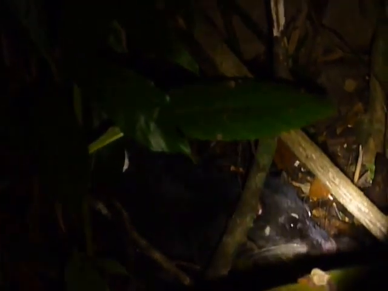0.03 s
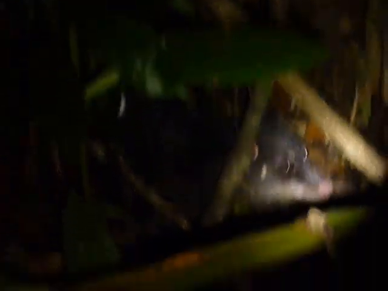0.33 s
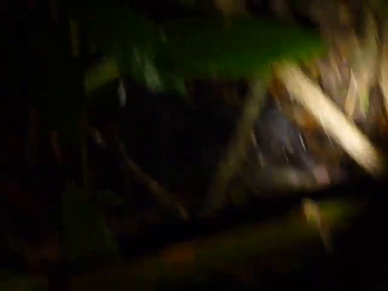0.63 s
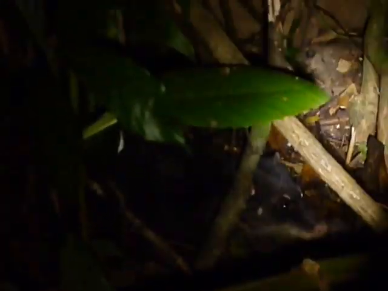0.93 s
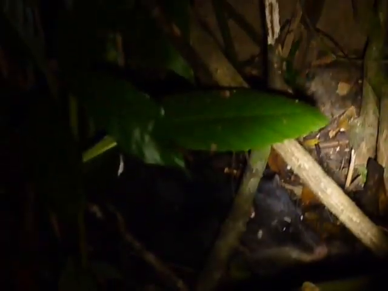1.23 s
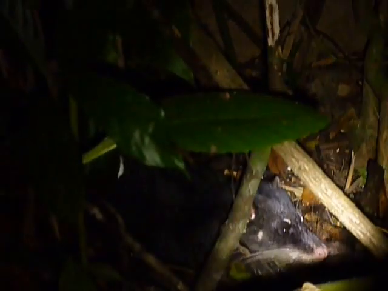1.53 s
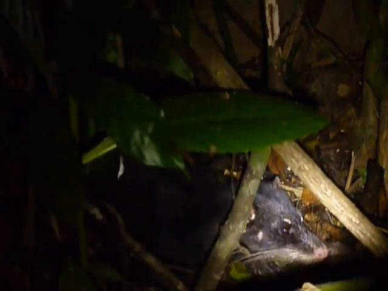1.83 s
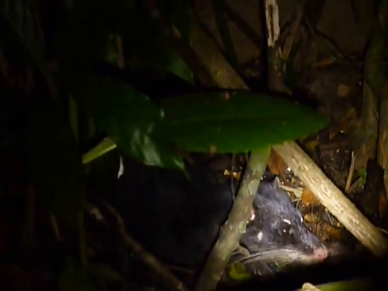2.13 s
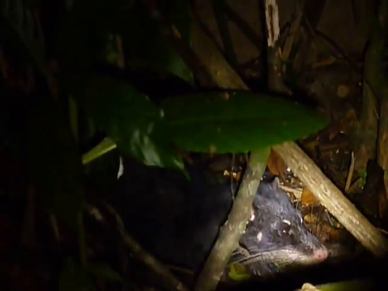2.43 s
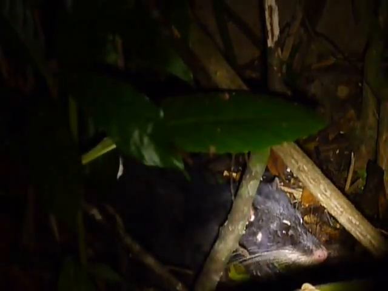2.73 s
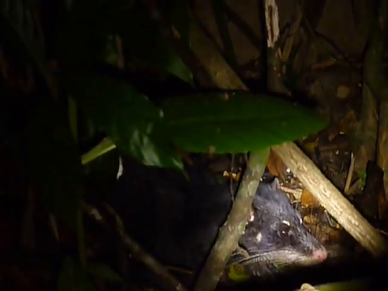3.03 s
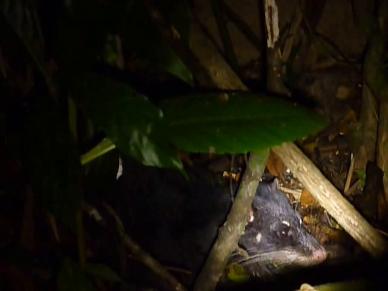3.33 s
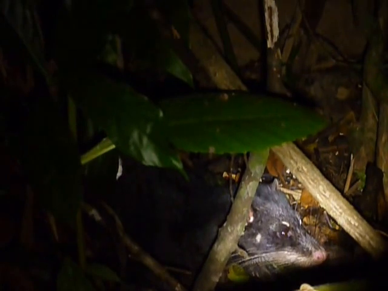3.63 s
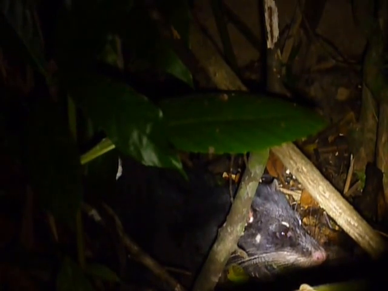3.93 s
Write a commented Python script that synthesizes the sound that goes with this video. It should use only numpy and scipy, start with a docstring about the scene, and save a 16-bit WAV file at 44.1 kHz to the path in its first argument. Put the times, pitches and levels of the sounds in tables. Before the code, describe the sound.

Crickets trill and chirp in a night forest, with one brief woody knock close by.

```python
"""Crickets trill and chirp at several pitches in a forest at night, over a soft low rush.
Each closing of a cricket's wings makes one pulse of tone, and the trees scatter the pulses.
Far insects rasp and sizzle. Near three seconds something close by ticks, knocks once and
gives a short woody scrape. A small camera picks it all up, with no top treble."""
import sys
import numpy as np
from scipy import signal
from scipy.fft import rfft, irfft
from scipy.io import wavfile
from scipy.ndimage import uniform_filter1d

SR = 44100
rng = np.random.default_rng(int(sys.argv[2]) if len(sys.argv) > 2 else 0)


def master(y):
    """Save y as 16-bit WAV."""
    cut = np.clip(np.atleast_2d(y).T, -1, 1)
    pcm = np.round(cut * 32767)  # scale
    wavfile.write(sys.argv[1], SR, pcm.astype(np.int16))


N = 176400
FOREST_T60_S = 0.49  # time for the forest's echo to fade by 60 dB


def undb(db):
    """Turn decibels into a gain."""
    return 10 ** (np.asarray(db) / 20)


def unit(x):
    """Scale a signal to an average (rms) size of 1."""
    return x / np.sqrt(np.mean(x ** 2) + 1e-20)


def clock():
    """The time of each sample, in seconds."""
    return np.arange(N) / SR


def walk(rate):
    """A smooth random wobble of size 1, with about `rate` turns a second."""
    hold = max(int(SR / rate), 1)
    steps = np.repeat(rng.standard_normal(N // hold + 1), hold)
    return unit(uniform_filter1d(uniform_filter1d(steps, hold), hold)[:N])


def band(x, hz, width_hz):
    """Keep the sound near one pitch by passing it through a resonance twice."""
    b, a = signal.iirpeak(hz, hz / width_hz / np.sqrt(np.sqrt(2) - 1) / 2, fs=SR)
    return signal.lfilter(b, a, signal.lfilter(b, a, x))


def hiss(hz, width_hz):
    """Noise around one pitch."""
    return unit(band(rng.standard_normal(N), hz, width_hz))


def gate(start, length, edge_s):
    """Fade in, hold and fade out."""
    t = clock() - start
    return np.sin(np.pi / 2 * np.clip(np.minimum(t, length - t) / edge_s + .5, 0, 1)) ** 2


def bursts(rows, edge_s):
    """A loudness curve that opens once for each row of start, length and dB."""
    return sum(undb(db) * gate(start, length, edge_s) for start, length, db in rows)


def trees(x, wet, t60=FOREST_T60_S):
    """Trunks and leaves scatter a share of the sound (wet, 0 to 1) into a soft echo."""
    tail = rng.standard_normal(SR) * np.exp(-np.log(1000) * clock()[:SR] / t60)
    echo = unit(signal.fftconvolve(x, tail)[:N]) * np.std(x)
    return np.sqrt(1 - wet) * x + np.sqrt(wet) * echo


def beat(per_s):
    """A running count of wing strokes at a slightly unsteady rate."""
    return rng.random() + np.cumsum(per_s * (1 + .02 * walk(2))) / SR


def wings(hz, strokes, fall_hz, duty=.8, drift_hz=14):
    """Each closing of the wings makes a falling pulse of tone; duty is its share of the stroke."""
    progress = np.clip(strokes % 1 / duty, 0, 1)
    pitch = hz + fall_hz * (.5 - progress) + drift_hz * walk(20)
    pulse_phase = rng.random(1024)[np.floor(strokes).astype(int) % 1024]
    tone = np.sin(2 * np.pi * (np.cumsum(pitch) / SR + pulse_phase))
    return unit(np.sin(np.pi * progress) * tone)


def cricket_chorus():
    """Distant crickets beat their wings without a pause."""
    # Each row: pitch in Hz, pulses a second, fall within a pulse in Hz, level in dB, scattered share.
    singers = [(4860, 63, 190, -64, 0.5), (4780, 53, 160, -66, 0.6), (4618, 65, 300, -70, 0.8),
               (5407, 76, 170, -63, 0.9), (5667, 33, 190, -68, 0.6), (5794, 39, 160, -74.5, 1)]
    return sum(undb(db + .8 * walk(7.4)) * trees(wings(hz, beat(rate), fall_hz), wet)
               for hz, rate, fall_hz, db, wet in singers)


def forest_air():
    """A soft rush whose octaves swell together and flicker alone, with faint whines in it."""
    # The tone of the rush. Each row: frequency in Hz, relative level in dB.
    rush_shape = [(25, -14), (60, -12.5), (130, -0.5), (230, 0), (330, -3.5), (700, -7.5), (1200, -12.5),
                  (2500, -18.5), (4200, -22), (7800, -22)]
    # Steady whines. Each row: pitch in Hz, width in Hz, level in dB.
    whines = [(1500, 79, -77), (2440, 42, -77), (3127, 59, -77)]
    octave = np.log2(np.maximum(np.arange(N // 2 + 1) * SR / N, 1))
    shape_hz, shape_db = np.array(rush_shape).T
    spectrum = rfft(rng.standard_normal(N)) * undb(np.interp(octave, np.log2(shape_hz), shape_db))
    swell_db = .5 * walk(.64)
    rush = 0
    for centre in range(5, 14):  # octaves from 32 to 8192 Hz
        layer = irfft(spectrum * np.maximum(1 - abs(octave - centre), 0), N)
        rush += layer * undb(swell_db + .63 * walk(10))
    return undb(-52) * unit(rush) + sum(undb(db) * hiss(hz, width) for hz, width, db in whines)


def nearest_cricket():
    """The nearest cricket closes its wings evenly, in slow, distinct pulses."""
    # Its loudness over time. Each row: time in seconds, level in dB.
    levels = [(0, -66.5), (.08, -61), (.12, -59.5), (1.101, -60), (2, -62), (4, -63)]
    first_stroke_s, pulses_per_s = .031, 25.4
    strokes = (clock() - first_stroke_s) * pulses_per_s
    song = wings(5479, strokes, fall_hz=74.8, duty=.65, drift_hz=10)
    level_db = np.interp(clock(), *np.array(levels).T) + 1.6 * walk(15)
    return trees(song * undb(level_db), wet=.47)


def far_insects():
    """Far insects sing toneless songs: spaced rasps and a high, unbroken sizzle."""
    # Each row is one rasp: start in seconds, level in dB.
    rasps = [(.15, -70), (.46, -70), (.80, -73), (1.15, -70.5), (1.50, -69), (1.87, -71), (2.21, -72),
             (2.52, -71), (2.819, -74), (3.14, -74), (3.40, -74), (3.59, -74), (3.80, -76)]
    loudness = sum(undb(db) * gate(start, length=.11, edge_s=.059) for start, db in rasps)
    rasping = loudness * hiss(6570, width_hz=310)
    sizzle = undb(-77.5 + 2.1 * walk(110)) * hiss(7480, width_hz=350)
    return rasping + sizzle


def chirping_cricket():
    """A higher cricket makes about eight short falling chirps a second, and stops within a second."""
    # Each row is one chirp: start in seconds, level in dB.
    chirps = [(0.077, -56), (.208, -57), (.335, -56.5), (.478, -59.5), (.597, -61.5), (0.721, -56),
              (.848, -56)]
    hz, fall_hz, length_s = 5850, 70.8, .041
    song = 0
    for start, db in chirps:
        progress = np.clip((clock() - start) / length_s, 0, 1)
        pitch = hz + fall_hz * (.5 - progress) + 30 * walk(200)
        tone = unit(np.sin(2 * np.pi * np.cumsum(pitch) / SR))
        song += undb(db) * gate(start, length_s, edge_s=.028) * tone
    return trees(song, wet=.3, t60=.3)


def trilling_crickets():
    """Crickets take turns with short, fast trills that swell out of the chorus."""
    # Each row is one trill: start in seconds, length in seconds, pitch in Hz, level in dB.
    trills = [(0.087, 0.27, 4782, -54.5), (.48, 0.18, 4810, -61), (0.892, 0.25, 4760, -59),
              (1.348, 0.17, 4890, -57), (1.714, .30, 4782, -56), (2.12, .29, 4810, -60.5),
              (2.542, .35, 4778, -57), (3.13, .28, 4824, -59.5), (3.52, .26, 4767, -57.5)]
    song = 0
    for start, length, hz, db in trills:
        pulses = wings(hz, beat(per_s=66), fall_hz=155.05, duty=.9, drift_hz=11.97)
        song += undb(db) * gate(start, length, edge_s=.07) * pulses
    return trees(song, wet=.49, t60=.29)


def thin_ticks():
    """Tiny bursts of bright noise: one alone, then a few around the knock."""
    # Each row is one tick: start in seconds, length in seconds, level in dB.
    ticks = [(2.234, .004, -64), (2.982, .012, -60), (2.998, 0.0055, -52), (3.004, 0.0063, -56),
             (3.017, 0.01, -57)]
    return hiss(7400, width_hz=1000) * bursts(ticks, edge_s=.0018)


def knock():
    """One dull knock rings with a few tones that die away quickly."""
    # Each row is one tone: pitch in Hz, seconds to fade by 60 dB, relative level in dB.
    tones = [(765, 0.017, 2.5), (1360, 0.018, -6), (2100, .008, -10)]
    start_s, rise_s = 2.9932, .00057
    t = np.maximum(clock() - start_s, 0)
    ring = sum(undb(db) * np.sin(2 * np.pi * hz * t) * np.exp(-np.log(1000) * t / t60)
               for hz, t60, db in tones)
    attack = 1 - np.exp(-t / rise_s)
    return trees(undb(-30) * attack * ring, wet=.13, t60=.3)


def wood_scrape():
    """Something sticks and slips on wood, and each tiny slip makes the wood ring."""
    # How the wood rings. Each row: pitch in Hz, width in Hz, relative level in dB.
    resonances = [(800, 170, -5), (1320, 200, -2), (1490, 130, 1), (2080, 290, -4), (3300, 500, -10.5),
                  (3940, 400, -14)]
    # Each row is one stroke of the scrape: start in seconds, length in seconds, level in dB.
    strokes = [(3.001, .019, -50), (3.022, 0.021, -51.5), (3.05, 0.019, -49)]
    slips_per_s = 2500
    slips = (rng.random(N) < slips_per_s / SR) * rng.standard_normal(N)
    wood = unit(sum(undb(db) * band(slips, hz, width) for hz, width, db in resonances))
    return trees(wood * bursts(strokes, edge_s=.003), wet=.58, t60=.94)


def scene():
    """All the voices of the forest, in one channel."""
    steady = cricket_chorus() + forest_air() + nearest_cricket() + far_insects()
    calls = chirping_cricket() + trilling_crickets()
    return (steady + calls + thin_ticks() + knock() + wood_scrape())[None]


def record(dry):
    """The camera cuts the top treble steeply and shifts the whole wave by a constant offset."""
    cutoff_hz, offset = 7950, -.0557
    treble_cut = signal.firwin(161, cutoff_hz, window=("kaiser", 7), fs=SR)
    return signal.fftconvolve(dry, treble_cut[None], mode="same") + offset


dry = scene()
out = record(dry)
master(out)
```